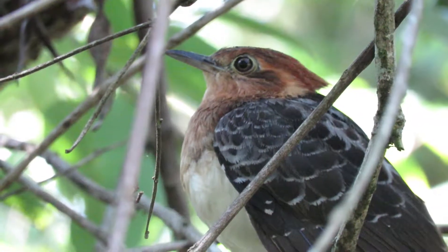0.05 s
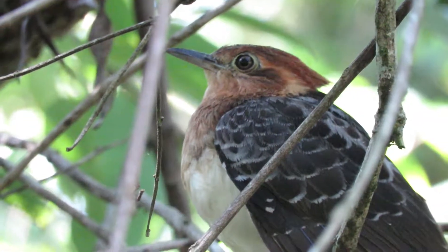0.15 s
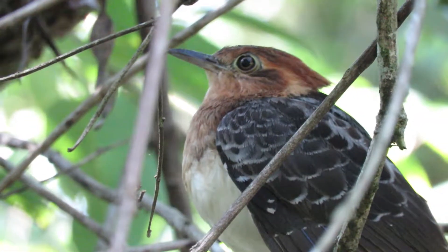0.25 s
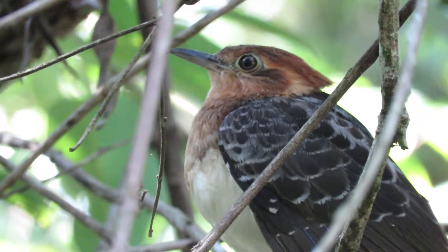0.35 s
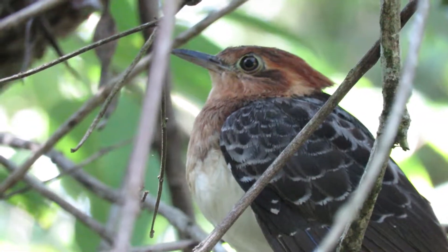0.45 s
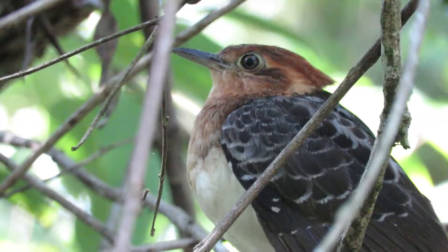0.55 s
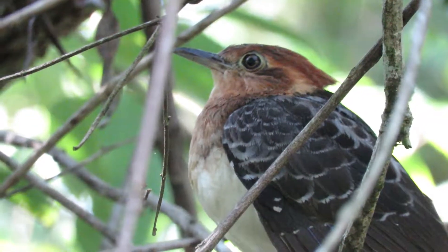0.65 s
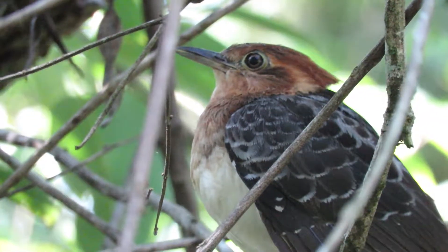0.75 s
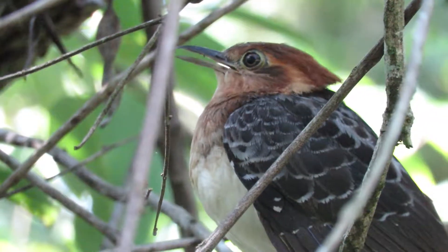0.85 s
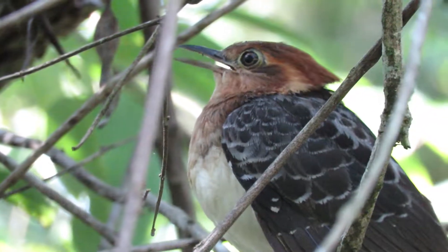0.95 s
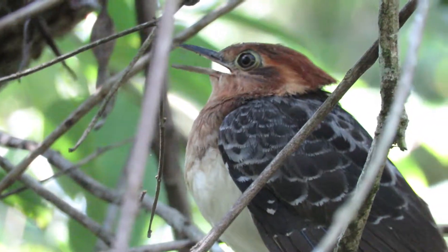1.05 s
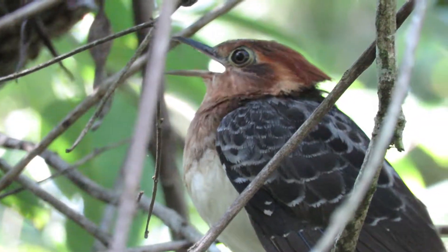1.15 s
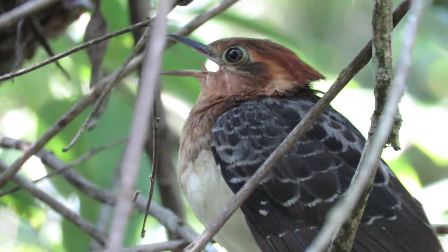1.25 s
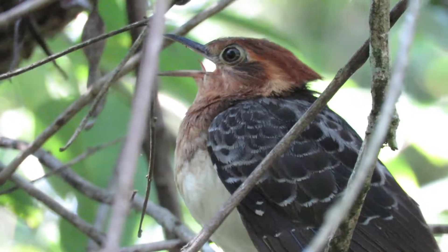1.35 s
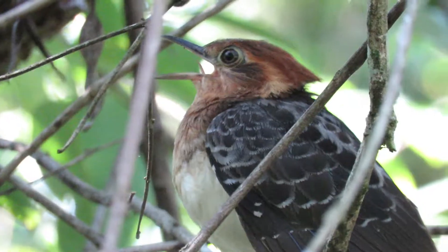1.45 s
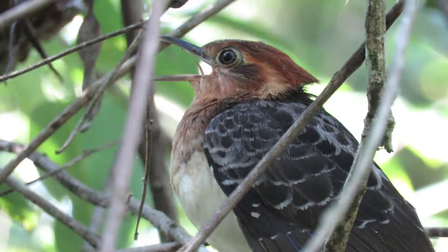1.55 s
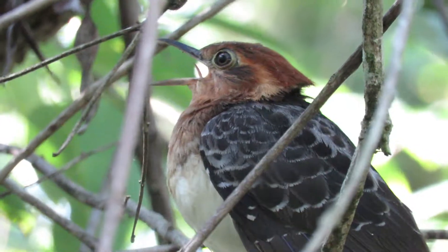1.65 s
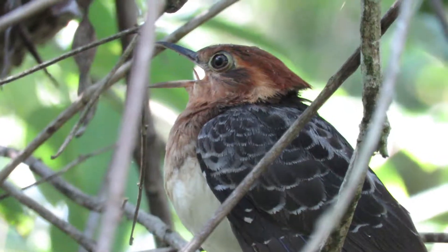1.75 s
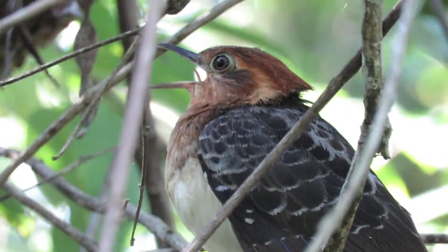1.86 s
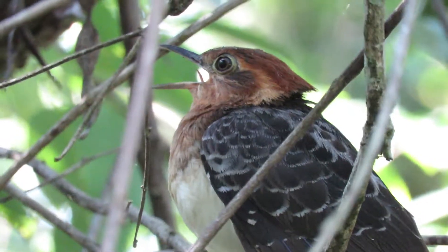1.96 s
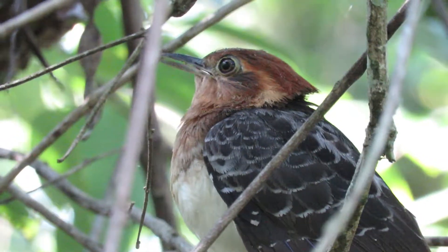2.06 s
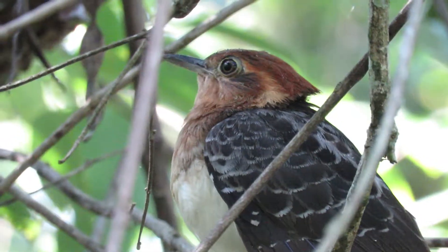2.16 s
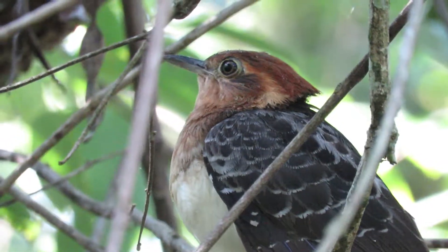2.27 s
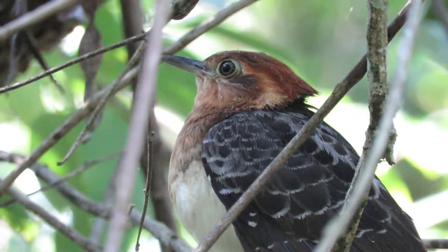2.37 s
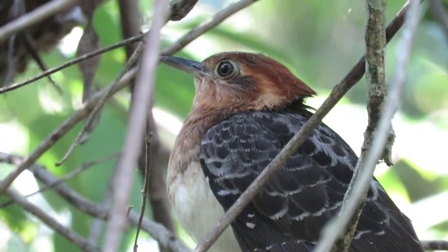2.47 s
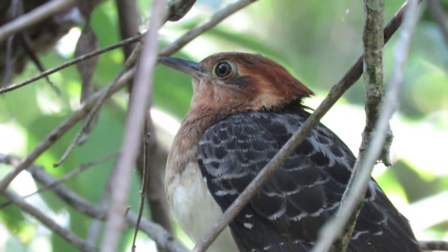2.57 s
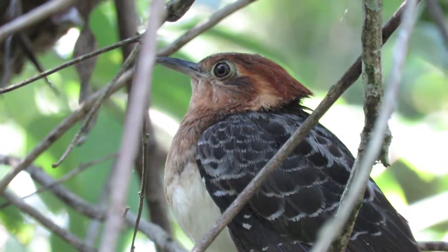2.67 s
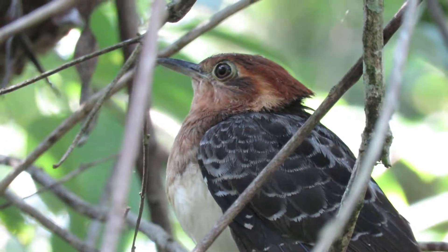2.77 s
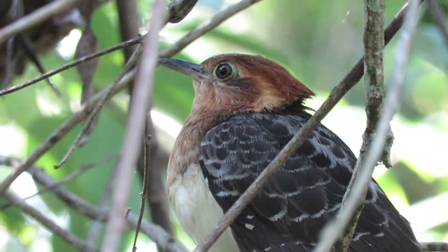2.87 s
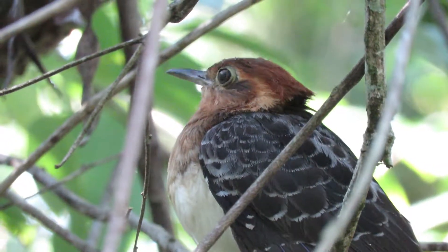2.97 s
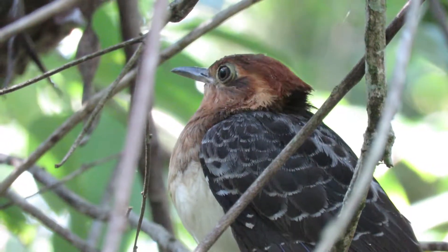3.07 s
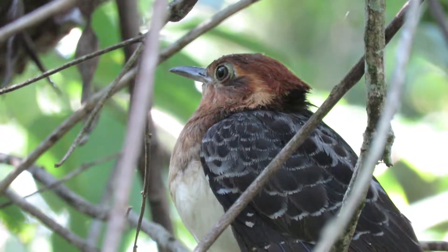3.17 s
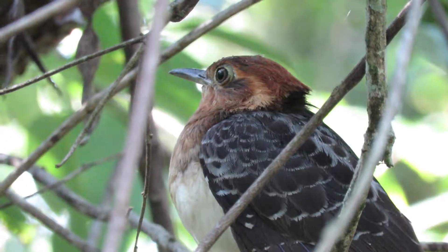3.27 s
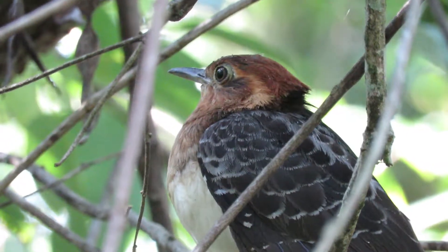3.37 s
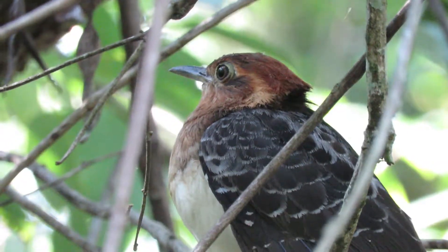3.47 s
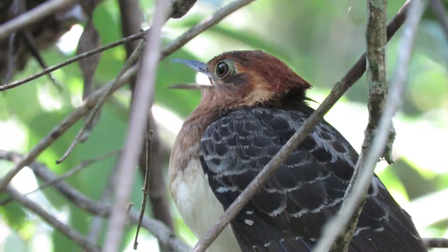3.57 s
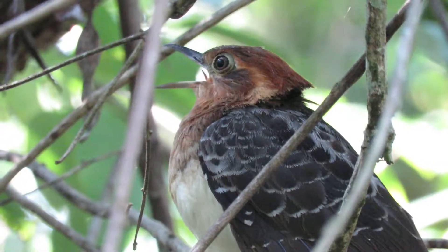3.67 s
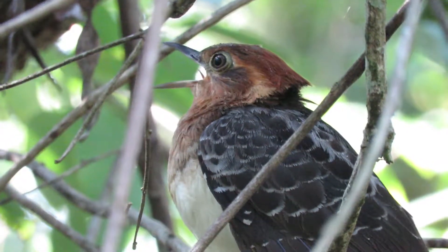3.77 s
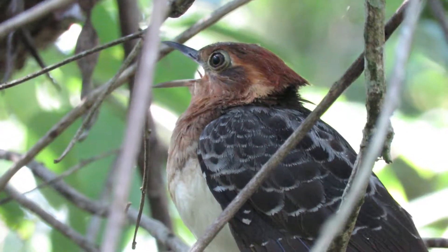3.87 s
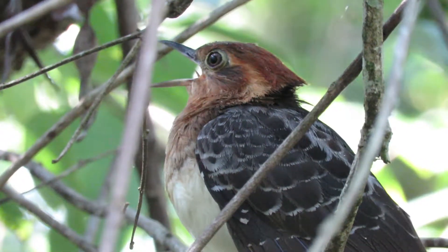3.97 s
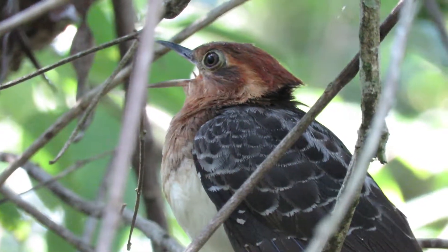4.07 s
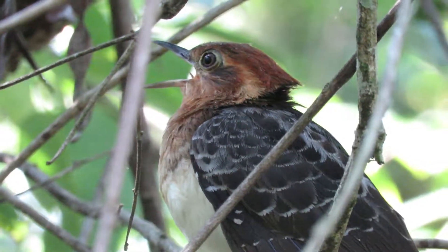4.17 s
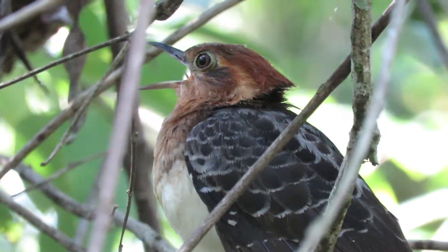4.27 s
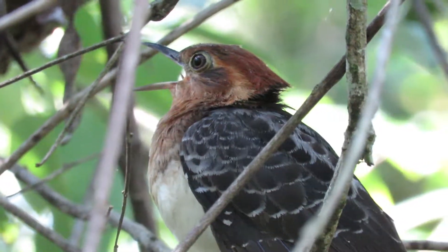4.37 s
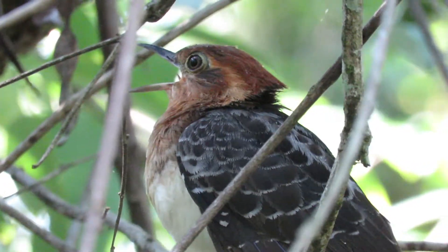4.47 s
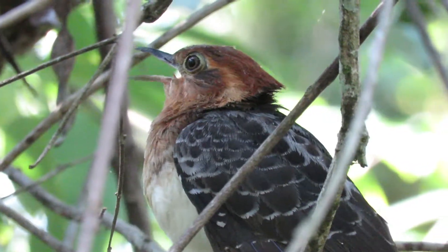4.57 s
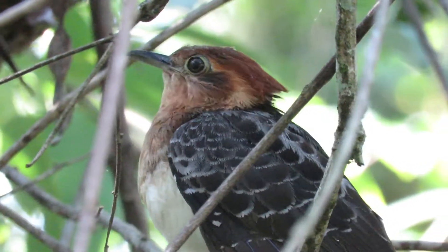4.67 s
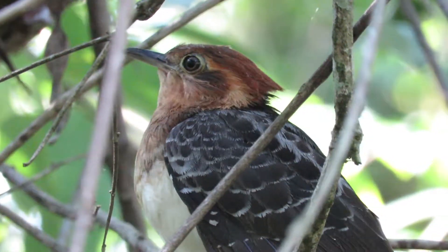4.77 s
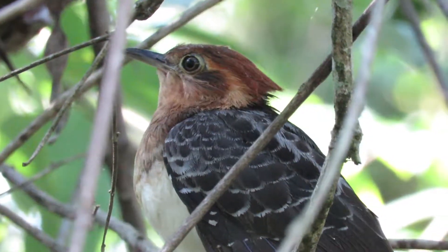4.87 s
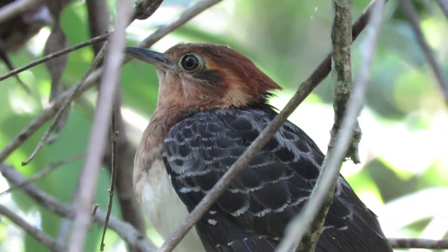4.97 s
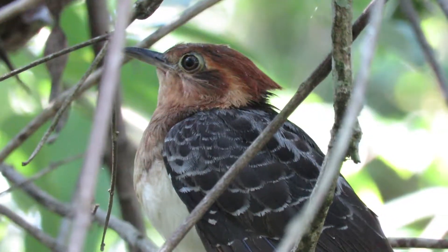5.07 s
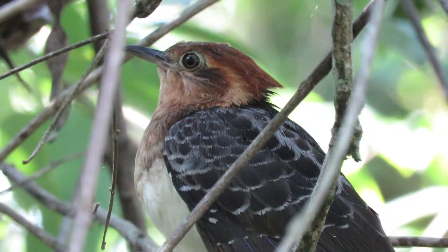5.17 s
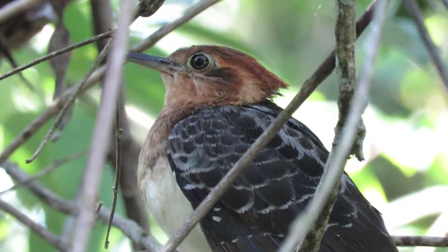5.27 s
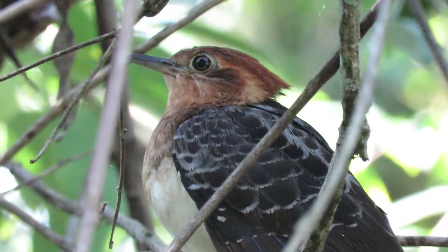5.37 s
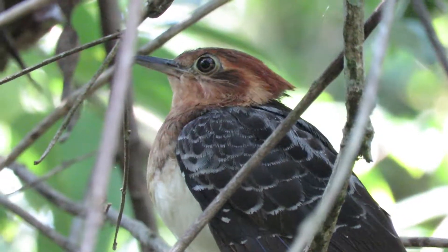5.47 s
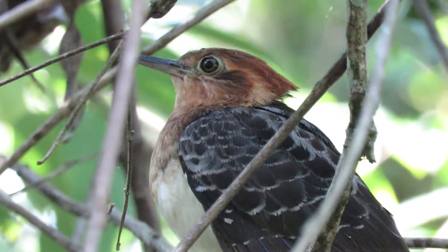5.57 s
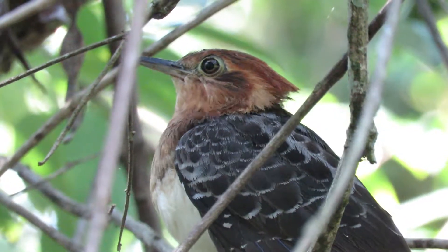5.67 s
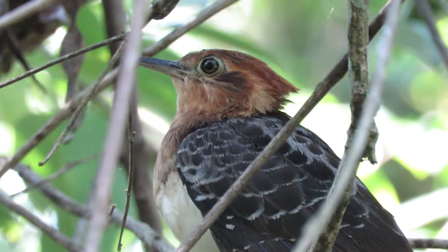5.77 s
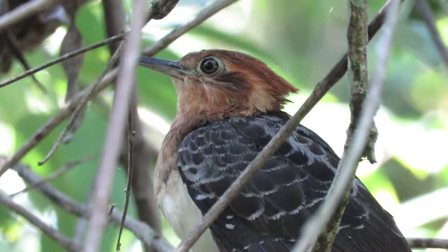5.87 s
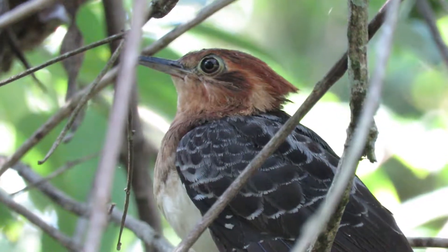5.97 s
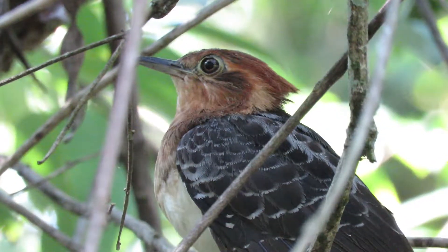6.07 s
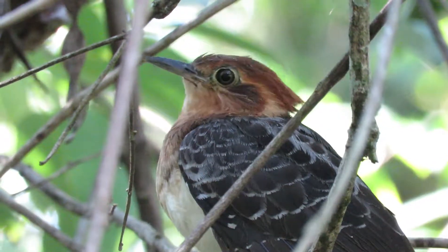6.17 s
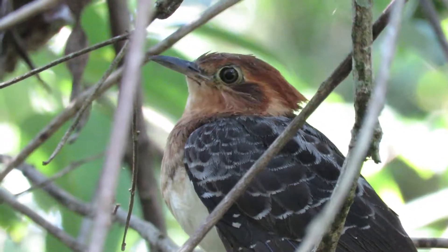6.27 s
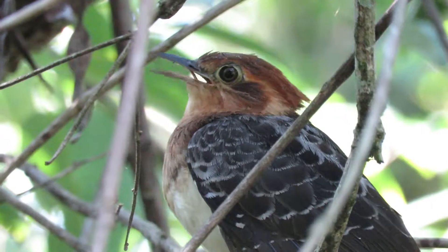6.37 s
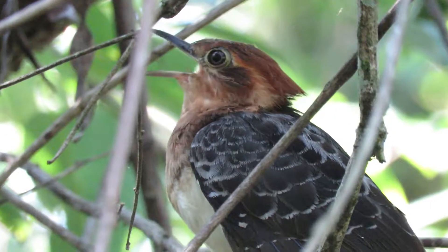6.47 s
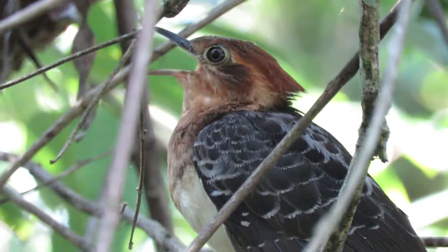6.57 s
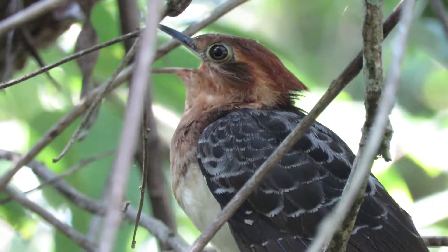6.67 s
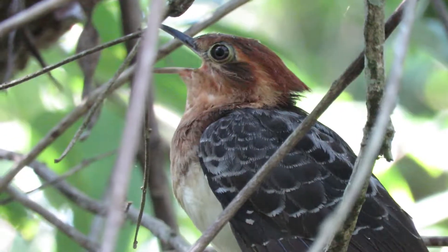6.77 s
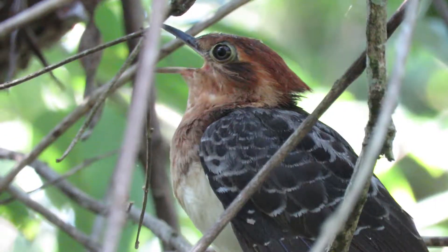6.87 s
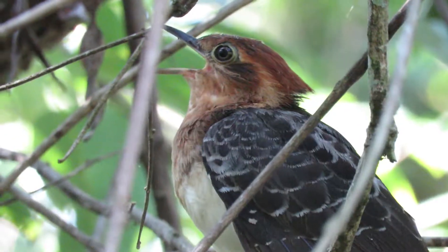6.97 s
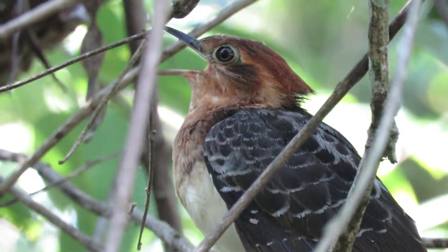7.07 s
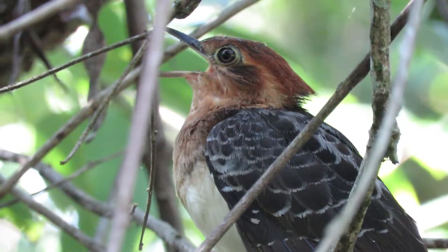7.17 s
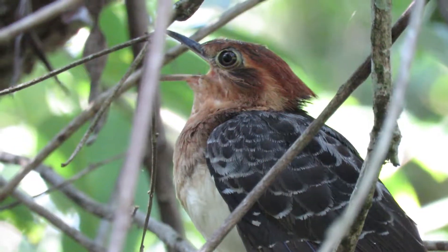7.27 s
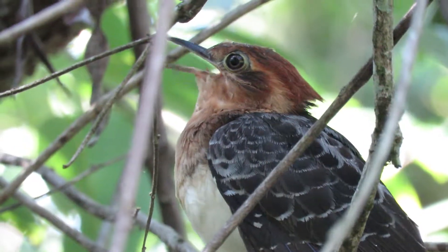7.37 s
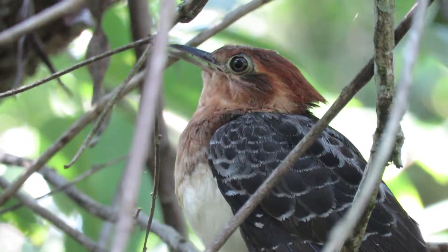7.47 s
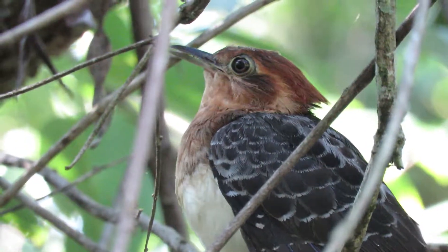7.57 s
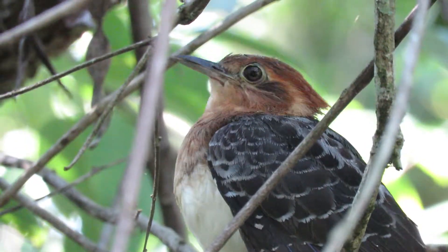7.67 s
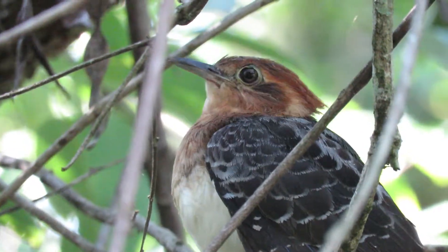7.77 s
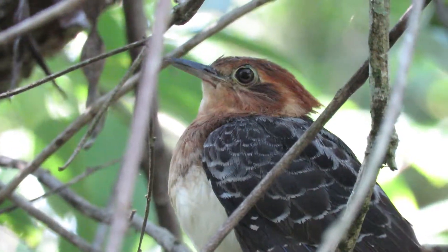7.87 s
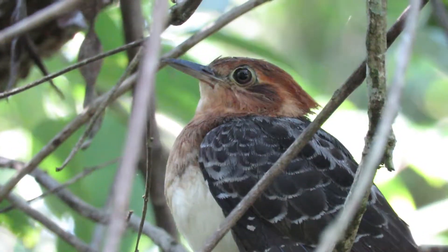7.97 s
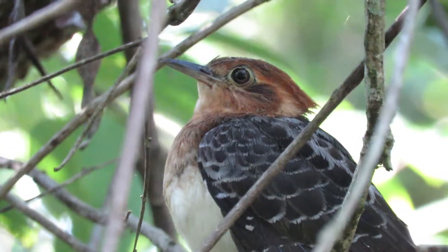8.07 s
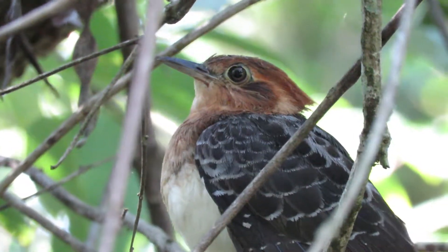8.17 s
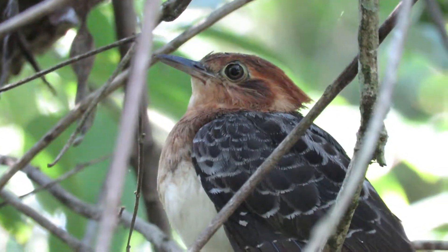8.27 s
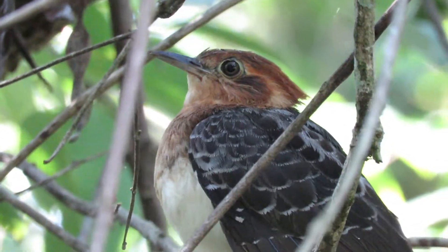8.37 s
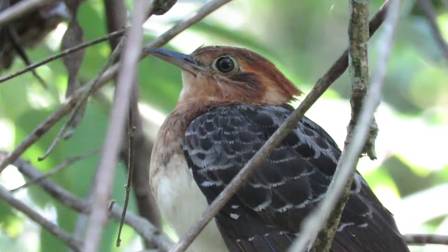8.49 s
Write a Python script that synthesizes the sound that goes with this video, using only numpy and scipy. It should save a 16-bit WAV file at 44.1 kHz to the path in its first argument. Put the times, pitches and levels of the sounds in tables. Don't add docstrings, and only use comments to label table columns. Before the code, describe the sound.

Three slow, clear bird whistles grow in strength amid shrill insect trilling, dry leaf ticks, soft handling knocks and a faint motor rattle.

```python
import sys
import numpy as np
from scipy import signal
from scipy.fft import rfft, irfft, next_fast_len
from scipy.io import wavfile
from scipy.ndimage import uniform_filter1d

SR = 44100
rng = np.random.default_rng(int(sys.argv[2]) if len(sys.argv) > 2 else 0)


def how_loud(loudness_db):
    steps = np.asarray(loudness_db, float) / 20
    return 10 ** steps


def wav_out(sig):
    wavfile.write(sys.argv[1], SR, np.round(np.clip(np.atleast_2d(sig).T, -1, 1) * 32767).astype(np.int16))


N = 376173
TIME = np.arange(N) / SR
PORTS = np.array([[.5], [-.5]])

# centre_hz, width_hz, lift_db
BODY_MODES = [
    (76.7, 4.5, 9),
    (446, 46, 0.5),
    (778, 33, 7),
    (1007, 27, 6.5),
    (1472, 37, 9.5),
]
# frequency_hz, density_db_per_hz
HUM_MID_SPECTRUM = [(13, -53.5), (22, -31), (75, -8), (145, -10.5), (188, -1), (329, -1), (389, -15),
                    (427, -0.5), (460, -2.5), (620, -16), (668, -5.5), (989, -4.5), (1150, -15.5),
                    (1460, -19), (1900, -33.5), (2470, -49), (4180, -120)]
HUM_SIDE_SPECTRUM = [(13, -77), (22, -47), (139, -13.5), (278, -4.5), (576, -7), (707, -17), (806, -6),
                     (918, -16), (1010, -13.5), (1900, -27), (2470, -52), (4180, -120)]
# frequency_hz, density_db_per_hz
AIR_MID_SPECTRUM = [(880, -60.5), (1500, -16.5), (2150, -23), (3500, -27), (4300, -24.5), (5700, -27),
                    (8000, -35.5), (9900, -43), (11000, -48), (13000, -42), (15000, -55.5), (15700, -76.5)]
AIR_SIDE_SPECTRUM = [(880, -44.5), (1500, -18), (2100, -18), (3600, -24), (5000, -14.5), (6000, -27.5),
                     (8600, -30.5), (10300, -25), (11000, -39.5), (13200, -37.5), (15000, -45.5),
                     (15700, -77)]
# frequency_hz, density_db_per_hz
CHORUS_SPECTRUM = [(3300, -40), (3900, -24), (4200, -12), (4450, -3), (4700, 0), (4900, -3), (5200, -6),
                   (5320, -24), (6000, -45)]
# start_s, length_s, level_db
DRIVE_SPELLS = [(1.166, 0.908, -44.5), (1.78, 0.43, -50.5), (3.183, 0.72, -45), (4.2, .5, -54.5),
                (4.7, .45, -50.5), (5.213, 0.63, -45.5), (5.554, 0.24, -51.5), (6.38, 0.39, -47),
                (6.78, 0.31, -47.5), (7.13, 0.3, -53.5), (7.78, 0.66, -46)]
# frequency_hz, density_db_per_hz
DRIVE_SPECTRUM = [(90, -33.5), (150, -8.5), (240, -0.5), (350, -2), (560, -5), (800, -4), (1150, -18),
                  (2100, -26)]
# start_s, length_s, level_db
WHIRR_SPELLS = [(1.14, .3, -61.5), (1.75, 0.29, -62), (3.15, 0.37, -60.5), (4.68, 0.27, -58.5),
                (5.2, 0.29, -69), (5.6, 0.34, -63.5), (6.35, 0.43, -59.5), (8.1, 0.29, -58)]
# frequency_hz, density_db_per_hz
WHIRR_SPECTRUM = [(1200, -18), (1550, -3.5), (2000, -2.5), (2300, -9), (3000, -14.5)]
# start_s, peak_db, pitch_hz, left_lead_rad, fade_s
KNOCKS = [(.395, -24, 326, 2.05, 0.0053), (0.6486, -20.5, 403, 2.4, 0.0045),
          (0.655, -32.5, 266, 1.1, 0.0063), (0.672, -25, 306, 4.2, 0.0042),
          (0.772, -23.5, 315, 2.16, 0.016), (0.786, -21, 264, 2.2, 0.0042), (2.043, -34, 238, 0.4, 0.019),
          (2.267, -26, 327, 0.23, 0.0041), (2.281, -30.5, 202, 0.3, 0.0053), (5.38, -38, 434, 0.18, 0.03),
          (5.62, -36, 343.7, 0.34, 0.01), (5.661, -38.5, 288, 0.39, 0.013)]
# start_s, peak_db, lows_minus_peak_db, left_minus_right_db
LEAF_TICKS = [(0.6484, -53.5, -5, -2), (1.385, -63, -6, 4), (1.901, -39, 1.5, -2), (1.96, -54.5, 17, 0.5),
              (3.421, -39.5, 2.5, 0.5), (4.7421, -47.5, 14, -2.5), (4.79, -49, 6, -6), (4.8325, -58, 10, 0),
              (4.8389, -51, 12, -4), (5.237, -56, -7, -11), (5.545, -59, 14, -5), (5.5653, -59, -6, 7),
              (5.7663, -54, 20, -4), (6.128, -57.5, 12, -4), (6.3096, -43, -19, -3),
              (6.988, -39, -20.5, 3.5), (7.403, -55, -2, 0), (7.415, -56, 16, -2), (7.432, -61, 7, 0.5),
              (7.5143, -58.5, 10.5, -1.5), (7.6095, -59, 15, -2), (.2982, -57, 14, 3), (.7632, -50, 4, -3),
              (3.3498, -59, 8, 0), (3.3827, -51.5, 1, 2.5), (5.3916, -63, 6, -2), (5.518, -59.5, 9.5, 1.5),
              (8.166, -47.5, -3, -1), (1.272, -53.5, 0, 0), (1.5803, -48.5, 0, -1), (1.9824, -55, -3, 1),
              (2.0582, -51.5, 2, -1), (2.5685, -48.5, -10, 1), (3.681, -50, -3, 0), (6.5531, -48, -5, 1),
              (6.61, -52, -8, -3.5), (6.7157, -49.5, -5, 1), (6.8242, -42.5, -13, 2), (7.119, -47, -9, 2.5),
              (7.285, -53.5, -4, -1), (7.32, -51, -7, 1), (7.5329, -55, -4, 0.5), (7.654, -54, 7.5, 1),
              (7.713, -54, -6, .5), (7.7948, -53, -4, 0)]
# start_s, peak_db, lows_minus_peak_db, left_minus_right_db, length_s
LEAF_RUSTLES = [(0.193, -45.5, -1.5, -2, 0.015), (0.398, -51, 1, -3, 0.024), (0.777, -47.5, 0, -3, 0.026),
                (0.864, -39, -14.5, 1, 0.033), (1.546, -50, -19, -2.5, 0.012),
                (1.567, -48.5, -1.5, -2, 0.027), (1.853, -52, 0.5, 1, 0.0376), (2.58, -59, -17, 4, 0.0096),
                (2.72, -40, -14, -1, 0.03), (5.077, -41.5, -14, -1, 0.036), (5.681, -57, 11, 1, 0.0294),
                (5.778, -45, -3, 1, 0.038), (6.265, -44, -7.5, 0, 0.036), (6.421, -60.5, 12, 0, 0.035),
                (6.843, -26, -12.5, 2.5, 0.013), (6.984, -24.5, -14.5, 2, 0.0085),
                (7.126, -44, -12, 1, 0.013), (7.843, -45, -2.5, 0, .02), (7.885, -41.5, -10.5, -4, 0.033),
                (7.933, -42.5, -11, 1, 0.017), (8.244, -62, 10, 2, 0.027), (6.526, -52, -5.5, 0, 0.037)]
# time_s, strokes_so_far
WING_STROKES = [(0.0, 1.05), (0.19, 11.01), (0.76, 41.77), (1.24, 67.47), (1.33, 72.36), (1.87, 100.92),
                (2.17, 116.66), (2.32, 124.53), (2.47, 131.91), (2.77, 145.99), (2.92, 153.49),
                (3.01, 158.73), (3.13, 165.71), (3.34, 177.74), (3.61, 192.71), (3.76, 200.97),
                (3.88, 207.46), (4.09, 218.1), (4.24, 226.39), (4.72, 252.38), (5.74, 308.3),
                (5.92, 317.71), (6.04, 323.62), (6.13, 327.96), (6.94, 374.18), (7.42, 400.99),
                (7.78, 420.72), (8.08, 436.86), (8.32, 449.44), (8.53, 460.18)]
# time_s, depth_in_units_of_12_db
TRILL_PAUSES = [(.41, -1), (.598, -1), (.787, -0.5), (.958, -0.5), (1.128, -1), (1.321, -0.5),
                (1.502, -1.5), (1.702, -1.5), (1.907, -1.5), (2.137, -0.5), (2.931, -3), (3.118, -1.5),
                (3.26, -1), (3.42, -0.5), (3.584, -1.5), (3.765, -1), (3.94, -3), (4.176, -2), (4.37, -1),
                (4.589, -2), (4.79, -1), (4.97, -1.5), (5.15, -1.5), (5.332, -1), (5.52, -2.5), (5.746, -1),
                (5.964, -0.5), (6.24, -5), (6.423, -4.5), (6.61, -1.5), (6.82, -0.5), (7.53, -0.8),
                (8.0, -1), (8.175, -0.5), (8.27, -0.5), (8.41, -3)]
# time_s, level_db, wing_pitch_hz, octave_minus_level_db
CRICKET_COURSE = [(0, -46.5, 4980, -20), (.3, -43.5, 4968, -22.5), (2.8, -43, 5008, -26),
                  (3, -44, 5007, -24.5), (4.6, -43, 4970, -23.5), (4.8, -47, 4999, -22),
                  (5.7, -44.5, 5024, -25), (6.3, -50, 5017, -21), (6.55, -47.5, 5050, -28),
                  (6.85, -43.5, 5067, -30), (7.4, -45, 5100, -38), (7.9, -44, 5086, -38),
                  (8, -46, 5100, -36), (8.53, -46, 5010, -25)]
# delay_s, level_db, left_minus_right_db
TRUNK_ECHOES = [
    (.035, -32, -2.5),
    (.115, -25, 0.5),
    (.21, -25.5, -1.5),
]
FACING_LEVELS = [
    -7,
    -3.5,
    2,
]
# time_s, pitch_hz, level_db, left_lead_rad
HELD_NOTES = [
    [(1.268, 2276, -52, 0), (1.29, 2344, -59.5, 1), (1.379, 2374, -56, -1.9), (1.449, 2416, -63, -3.1),
     (1.49, 2390, -68, -1.5), (1.57, 2410, -59, -4.5), (1.614, 2410, -60, -4.5), (1.646, 2420, -52, -4.5),
     (1.785, 2440, -45, -6.5), (2.017, 2423, -50.5, -5)],
    [(3.785, 2435, -39, 0.4), (3.863, 2454, -33.5, -0.25), (3.949, 2472, -34, -0.51),
     (4.129, 2496, -44.5, -1.4), (4.226, 2493, -37.5, 0.49), (4.353, 2498, -38, 1.4),
     (4.42, 2510, -27.5, 0.075), (4.47, 2508, -31, .1), (4.535, 2507, -32, 0.3), (4.575, 2494, -47.5, 0.52)],
    [(6.572, 2430, -27, -0.45), (6.59, 2458, -26.5, -0.39), (6.618, 2472, -28, -.6),
     (6.655, 2471, -24.5, -0.57), (6.7, 2476, -26.5, -0.9), (6.796, 2497, -28, 0.39),
     (6.901, 2498, -22.5, 0.43), (7.045, 2501, -26, 0.61), (7.06, 2498, -28, 0.9),
     (7.092, 2488, -42.5, 0.94), (7.125, 2484, -37, -0.25), (7.194, 2472, -27, -1.1),
     (7.24, 2485, -42, -0.86), (7.272, 2482, -39, -0.93), (7.345, 2498, -35.5, 0.43),
     (7.375, 2487, -34.5, .5)],
]
# start_s, throat_opens_s, end_s, lead_in_db, waver_db
CALLS = [
    (1.194, 1.245, 2.066, -54, -10),
    (3.678, 3.737, 4.646, -50, -10),
    (6.5, 6.545, 7.424, -43, -0.5),
]
# pitch_below_held_hz, left_lead_rad
SLIDE_UP = [
    (220, -.3),
    (100, -.4),
    (68, -.6),
    (56, -1.5),
    (48, 1.2),
]
# closing_db, dip_before_s, sag_share_left_at_dip, release_db, last_breath_db
CLOSINGS = [
    (-58, 0.014, 0.43, -22, -70),
    (-33.5, 0.019, 0.45, -27, -60),
    (-37, 0.019, 0.96, -16, -44.5),
]
# multiple, top_of_note_1_db, top_of_note_2_db, top_of_note_3_db, left_lead_rad
WHISTLE_OVERTONES = [
    (2, -90, -75, -66, .5),
    (4, -105, -89, -68, .9),
    (5, -105, -95, -78, 2.7),
    (6, -115, -110, -75, .7),
]
# start_s, length_s, level_db
BEAK_SPELLS = [(3.88, .1, -76.5), (4.05, 0.15, -74), (4.27, 0.056, -78), (4.39, .15, -71),
               (6.73, 0.058, -66), (6.81, .25, -64), (7.09, 0.087, -67), (7.2, .15, -71),
               (7.36, 0.084, -70)]


def level(x, db):
    return x * how_loud(db) / np.sqrt(np.mean(x ** 2))


def walk(rate):
    k = int(SR / rate)
    held = np.repeat(rng.standard_normal(N // k + 1), k)
    return 1.3 * uniform_filter1d(uniform_filter1d(held, k), k)[:N]


def band(x, lo_hz, hi_hz):
    sos = signal.butter(2, [lo_hz, min(hi_hz, .45 * SR)], "band", fs=SR, output="sos")
    return signal.sosfilt(sos, x)


def spells(rows, ramp_s):
    gain = 0
    for start, length, db in rows:
        inside_s = np.minimum(TIME - start, start + length - TIME)
        gain = gain + how_loud(db) * np.clip(inside_s / ramp_s, 0, 1)
    return gain


def wash(spectrum, db, flicker_db, modes=()):
    size = next_fast_len(N, True)
    hz = np.arange(size // 2 + 1) * SR / size + 1e-3
    points = np.array(spectrum)
    colour = np.interp(np.log(hz), np.log(points[:, 0]), points[:, 1], left=-120, right=-120)
    for centre, width, lift in modes:
        colour = colour + lift / (1 + (2 * (hz - centre) / width) ** 2)
    noise = rfft(rng.standard_normal(size)) * how_loud(colour)
    if not flicker_db:
        return level(irfft(noise, size)[:N], db)
    lowest, highest = np.log2(points[0, 0]), np.log2(points[-1, 0])
    out = 0
    for octave in np.arange(np.floor(lowest), highest + 1):
        share = np.cos(np.pi / 2 * np.clip(np.log2(hz) - octave, -1, 1)) ** 2
        patchy = 2.6 if 2 ** octave > 12000 else 1
        out = out + irfft(noise * share, size)[:N] * how_loud(flicker_db * patchy * walk(11))
    return level(out, db)


def floor():
    rumble_db = -62.5 + 0.68 * TIME + 1.5 * walk(0.43)
    rumble = level(band(rng.standard_normal(N), 50, 99), 0) * how_loud(rumble_db)
    mid = wash(HUM_MID_SPECTRUM, -45.5, 1.0, BODY_MODES) + rumble
    mid += wash(AIR_MID_SPECTRUM, -60, 1.8)
    side = wash(HUM_SIDE_SPECTRUM, -49.5, .9, BODY_MODES) + wash(AIR_SIDE_SPECTRUM, -59.5, 1.3)
    side = side + .05 * mid
    return mid + 2 * PORTS * side


def chorus():
    far = wash(CHORUS_SPECTRUM, -49, .5) * how_loud(1.5 * walk(150))
    return np.array([far, np.roll(far, 1)]) * how_loud(1.0 * PORTS)


def lens():
    step_hz, sharpness, ramp_s = 30.11, 0.55, 0.11
    turn = 2 * np.pi * np.cumsum(step_hz * (1 + .015 * walk(2.97))) / SR
    steps = np.exp(sharpness * (np.cos(turn) - 1)) * how_loud(1.6 * walk(25))
    mid = wash(DRIVE_SPECTRUM, 0, 0, BODY_MODES)
    side = wash(DRIVE_SPECTRUM, -9.0, 0, BODY_MODES)
    rattle = spells(DRIVE_SPELLS, ramp_s) * (mid + 2 * PORTS * side)
    gears = wash(WHIRR_SPECTRUM, 0, 0) + 2 * PORTS * wash(WHIRR_SPECTRUM, -5, 0)
    return level(steps, 0) * (rattle + spells(WHIRR_SPELLS, ramp_s) * gears)


def fingers():
    out, t = np.zeros((2, N)), TIME[:3000]
    for at, db, hz, lead, fade in KNOCKS:
        scrape = band(rng.standard_normal((2, len(t))), 150, 1460)
        ring = -np.sin(2 * np.pi * hz * t + lead * PORTS) + .7 * scrape
        envelope = np.exp(-t / fade) * (1 - np.exp(-t / 0.00011))
        out[:, int(at * SR):][:, :len(t)] += ring * envelope * how_loud(db)
    return out


def leaves():
    out, t = np.zeros((2, N)), TIME[:4000]
    for at, db, low_db, pan_db in LEAF_TICKS:
        tick = rng.standard_normal((3, len(t))) * np.exp(-t / 0.00098)
        tick = 0.69 * tick[0] + 1.0 * tick[1:]
        tick = band(tick, 4500, 10500) + how_loud(low_db + 6) * band(tick, 900, 4200)
        out[:, int(at * SR):][:, :len(t)] += tick * how_loud(db + pan_db * PORTS)
    for at, db, low_db, pan_db, length in LEAF_RUSTLES:
        crackle = how_loud(0.85 * np.repeat(rng.standard_normal(len(t) // 40), 40))
        envelope = np.exp(-t / length) * (1 - np.exp(-t / 0.0015))
        rub = rng.standard_normal((3, len(t))) * crackle * envelope
        rub = 0.42 * rub[0] + 0.69 * rub[1:]
        highs = band(band(rub, 4600, 7170), 2900, 12000)
        lows = how_loud(low_db + 9.5) * band(rub, 1600, 4100)
        papery = how_loud(-1) * band(rub, 3100, 3200)
        out[:, int(at * SR) - 60:][:, :len(t)] += (highs + lows + papery) * how_loud(db + pan_db * PORTS)
    return out


def cricket():
    count = np.interp(TIME, *np.transpose(WING_STROKES)) + .5
    stroke = count.astype(int)
    place = count % 1 - .5
    course = np.transpose(CRICKET_COURSE)
    db, hz, octave_db = (np.interp(TIME, course[0], c) for c in course[1:])
    chance = rng.standard_normal((stroke.max() + 1, 2))[stroke].T
    db += .8 * chance[0]
    pause_s = 0.029
    for at, depth in TRILL_PAUSES:
        near = slice(int((at - .1) * SR), int((at + .1) * SR))
        db[near] += 12.0 * depth * np.exp(-2 * ((TIME[near] - at) / pause_s) ** 2)
    fall_hz = -750 * place - 2000 * np.clip(place - .06, 0, .2)
    phase = 2 * np.pi * np.cumsum(hz + fall_hz + 25 * chance[1]) / SR
    swell = np.exp(-.5 * (place / np.where(place < 0, .125, .09)) ** 2)
    drag = how_loud(-14) * np.exp(-.5 * ((place - .22) / .08) ** 2)
    wing = np.sin(phase + .77 * PORTS) * how_loud(1.4 * PORTS)
    wing = wing + how_loud(octave_db) * np.sin(2 * phase + 2.5 * PORTS)
    return how_loud(db + 7 + 1.0 * walk(400)) * (swell + drag) * wing


def forest(x, t60_s, gap_s):
    t = TIME[:SR]
    tail = rng.standard_normal((2, SR)) * how_loud(-60 * t / t60_s) * np.clip(t / gap_s, 0, 1)
    return signal.fftconvolve(x[None], tail / np.sqrt(np.sum(tail[0] ** 2)), axes=1)[:, :N]


def trunks(x):
    return sum(np.roll(x, int(s * SR)) * how_loud(db + pan_db * PORTS) for s, db, pan_db in TRUNK_ECHOES)


def which_note():
    return np.searchsorted([call[0] for call in CALLS[1:]], TIME)


def whole(note, call, closing):
    start, opens, end, soft_db, waver_db = call
    closing_db, dip_s, share, release_db, after_db = closing
    voiced_s, catch_s, closing_s, sag_hz, dip_db = 0.013, 0.011, 0.026, 42.2, -1
    times = start, start + voiced_s, start + .45 * (opens - start), opens - catch_s, opens
    levels = soft_db - 23, soft_db, soft_db + waver_db, soft_db, soft_db - 15
    head = []
    for s, db, (below, lead) in zip(times, levels, SLIDE_UP):
        head.append((s, note[0][1] - below, db, lead))
    held_hz, held_lead = note[-1][1], note[-1][3]
    hz, lead = held_hz - sag_hz, held_lead - 1.2
    close = end - closing_s
    tail = [
        (close - dip_s, hz + sag_hz * share, closing_db + dip_db, held_lead),
        (close - dip_s / 2, hz + sag_hz * (1 - share), closing_db, lead),
        (close + closing_s / 2, hz, closing_db + dip_db, lead),
        (end, hz, closing_db + release_db, lead),
        (end + .014, held_hz, after_db, held_lead),
        (end + 0.08, held_hz, after_db - 17, held_lead),
    ]
    return head + note + tail


def overtones(phase, db):
    on = np.array([(TIME > call[0] + .1) * (TIME < call[2]) for call in CALLS])
    loudest = np.array([np.max(note, axis=0)[2] for note in HELD_NOTES])
    effort_db = uniform_filter1d(db, size=5000) - loudest @ on
    fade = uniform_filter1d(1. * on.sum(0), size=4000)
    which, out = which_note(), 0
    for multiple, *top_db, lead in WHISTLE_OVERTONES:
        multiple_db = np.array(top_db)[which] + .45 * np.minimum(effort_db, 0) + 2.5 * walk(12)
        tone = np.sin(multiple * phase + (lead + 0.4 * walk(6)) * PORTS)
        out = out + fade * how_loud(multiple_db) * tone
    third = spells(BEAK_SPELLS, .02) * how_loud(2.5 * walk(30)) * np.sin(3 * phase + 1.5 * PORTS)
    return out + third


def cuckoo():
    rows = np.concatenate([whole(*parts) for parts in zip(HELD_NOTES, CALLS, CLOSINGS)]).T
    hz, db, lead = (np.interp(TIME, rows[0], c) for c in rows[1:])
    phase = 2 * np.pi * np.cumsum(hz + 1.2 * walk(65)) / SR
    swing_db = 3.5 * np.sin(lead) * PORTS
    cancel_db = 20 * np.log10(np.maximum(abs(np.cos(lead / 2)), .35))
    db_port = db + 1.17 * walk(50) + swing_db - cancel_db
    sounding = sum((TIME > call[0]) * (TIME < call[2] + 0.08) for call in CALLS)
    out = sounding * how_loud(db_port) * np.sin(phase + lead * PORTS)
    return np.sqrt(2) * (out + overtones(phase, db))


def scene():
    bird, insect = cuckoo(), cricket()
    away = bird[0] * how_loud(np.array(FACING_LEVELS)[which_note()])
    tails = trunks(away) + how_loud(-26) * forest(away, t60_s=0.86, gap_s=0.016)
    tails += how_loud(-18) * forest(insect[0], t60_s=.25, gap_s=.004)
    return bird + insect + chorus() + tails + leaves() + fingers() + floor() + lens()


def gated(dry):
    sum_and_difference = [dry[0] + dry[1], dry[0] - dry[1]]
    hz, _, cells = signal.stft(sum_and_difference, SR, nperseg=2048, noverlap=1024)
    near = slice(*np.searchsorted(hz, (2050, 3450)))
    near_hz = hz[near]
    power = abs(cells[:, near]) ** 2
    tone = power.sum(0)
    away_hz = near_hz[:, None] - near_hz[tone.argmax(0)]
    slope_db = np.minimum(.028 * away_hz, -.006 * away_hz)
    step_db = -11 * (near_hz[:, None] > 3075)
    hidden = tone.max(0) * how_loud(2 * (-44.5 + slope_db + step_db))
    edges = np.arange(0, power.shape[1], 4)
    peaks = np.maximum.reduceat(power, edges, axis=1)
    bands = np.repeat(peaks, 4, axis=1)[:, :power.shape[1]]
    cells[:, near] *= bands / 4 > hidden
    mid, side = signal.istft(cells, SR, nperseg=2048, noverlap=1024)[1][:, :N]
    return mid / 2 + PORTS * side


def roll_off(x):
    return signal.sosfilt(signal.butter(12, 14000, fs=SR, output="sos"), x)


def record(dry):
    mix = gated(dry)
    return roll_off(mix)


dry = scene()
out = record(dry)
wav_out(out)
```